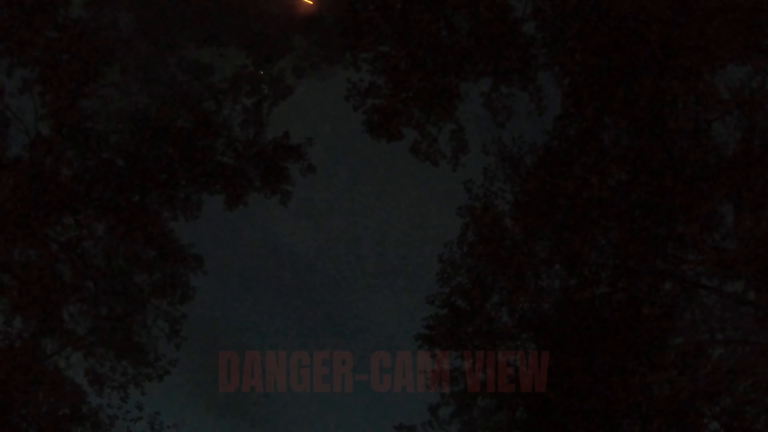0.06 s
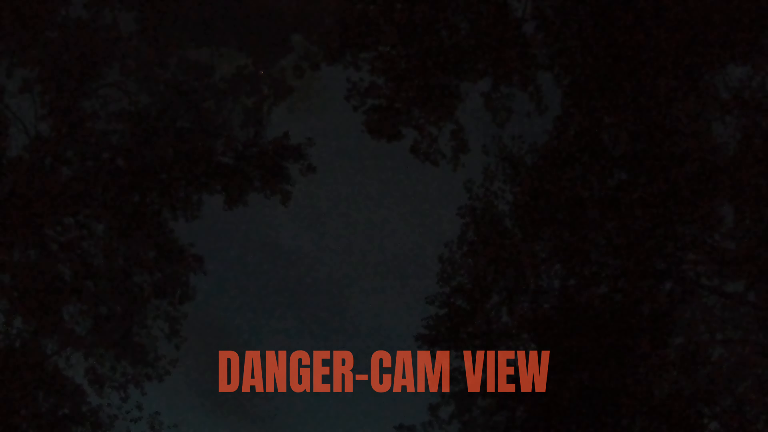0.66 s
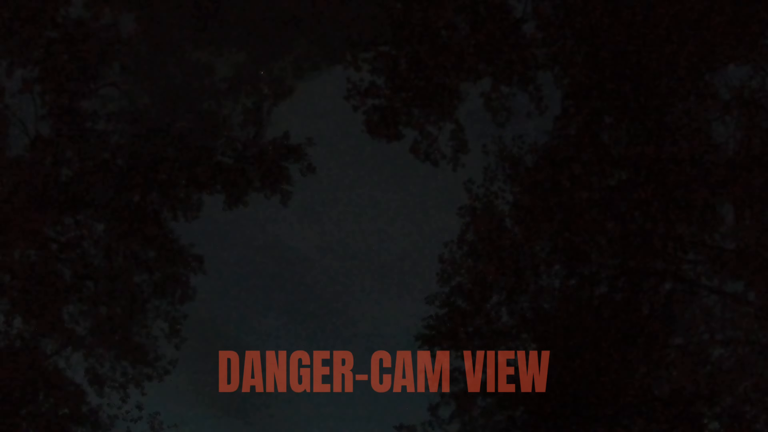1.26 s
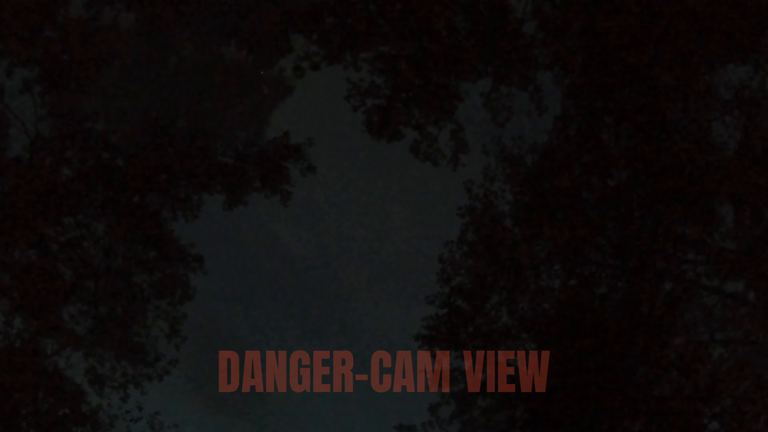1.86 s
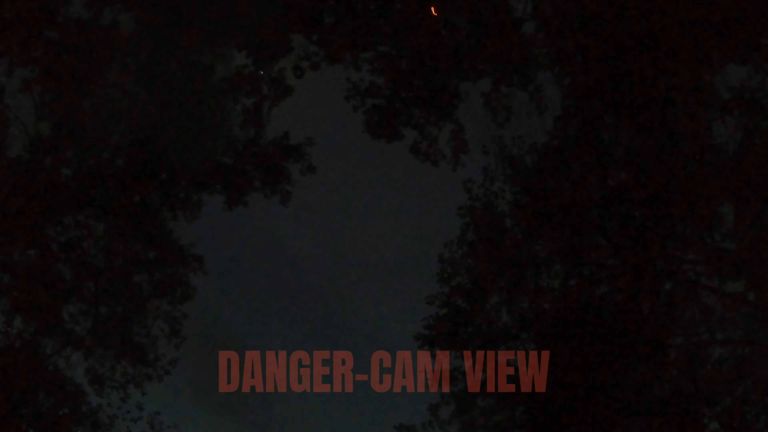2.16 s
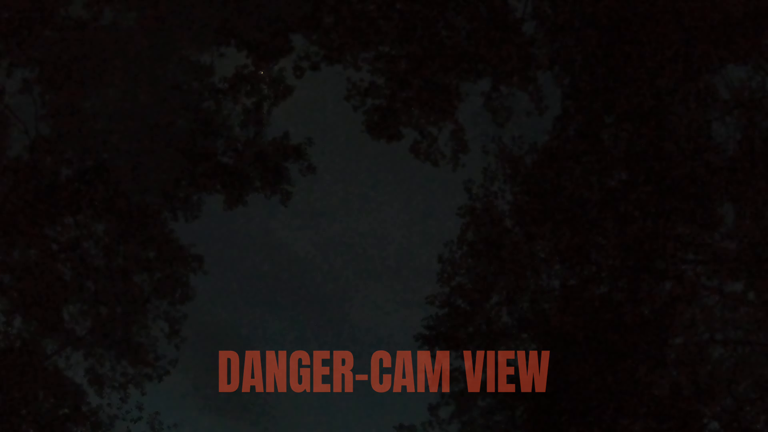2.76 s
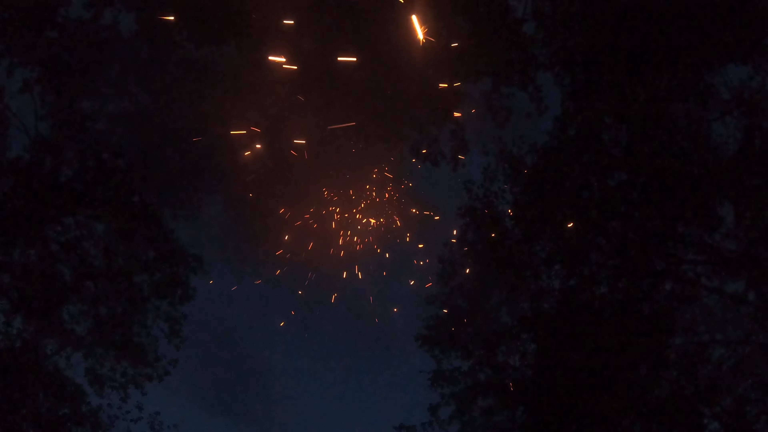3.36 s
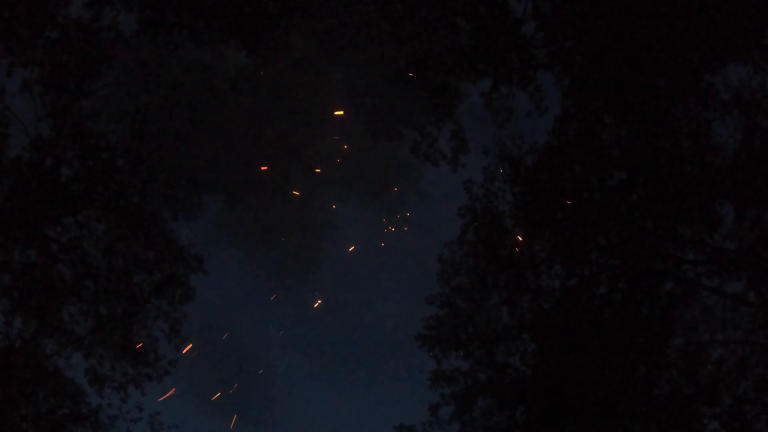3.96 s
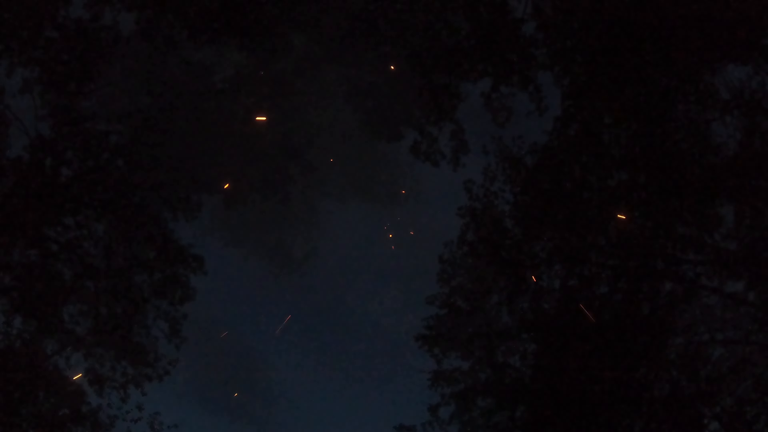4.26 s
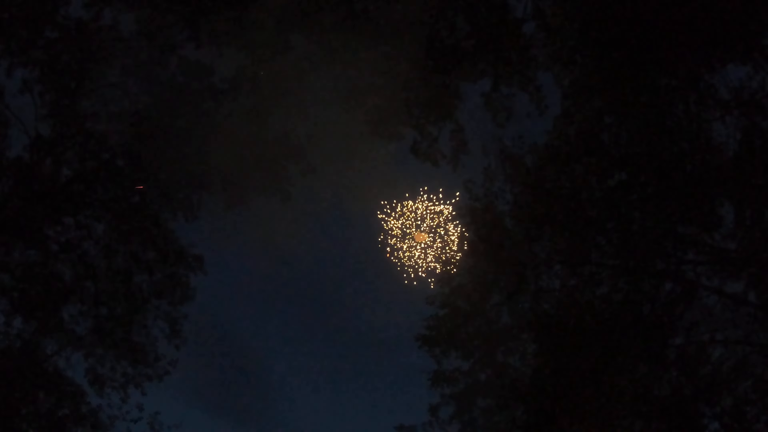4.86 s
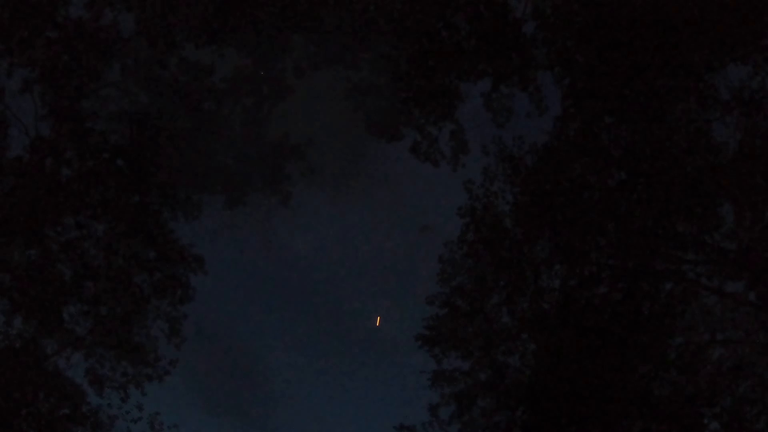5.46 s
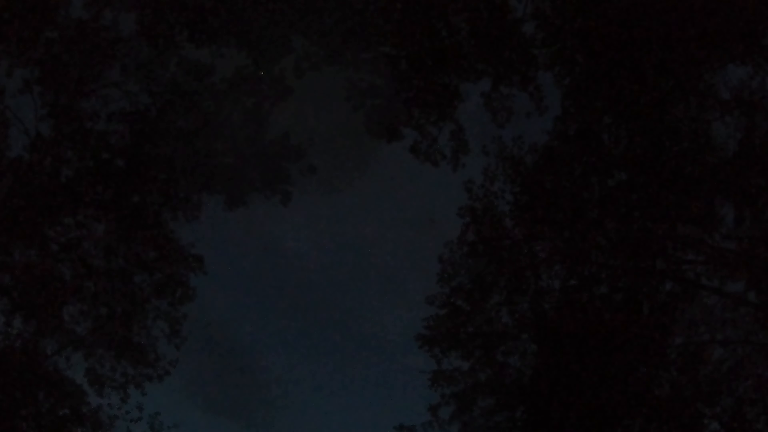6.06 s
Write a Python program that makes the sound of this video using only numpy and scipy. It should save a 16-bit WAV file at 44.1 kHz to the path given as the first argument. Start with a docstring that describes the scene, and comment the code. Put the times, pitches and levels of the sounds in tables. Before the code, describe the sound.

From the start, a firework fuse hisses and sputters in a mortar tube close by, slightly to the left. It is fairly quiet, with uneven spurts, a hollow ring from the tube and faint breathy whistles, over a low, wavering outdoor hum. At about 2.9 seconds the hiss ends in a sudden loud, thumping bang as the shell launches, and a short echo comes back from the woods. A dry snap follows just after 3.1 seconds, then a few faint ticks of falling scraps until about 4.4 seconds. At about 4.8 seconds the shell bursts overhead with a thump and a sharp, loud crack. Several quick echoes bounce back between 5 and 5.8 seconds, within a rolling rumble that grows duller and fades toward the end at about 6 seconds. Each blast pushes the background level down, so what follows sounds quieter.

```python
"""A firework fuse hisses, spurts and whistles in a mortar tube close by, over a low hum in the night air.
The lift charge bangs as hot gas tears out of the muzzle, scraps tick down, and the shell bursts
overhead with a thump and a sharp crack. Both blasts roll back from the woods, duller as they fade,
and each drives a gain control far down, from where it creeps back."""
import sys
import numpy as np
from scipy import signal
from scipy.fft import rfft, irfft
from scipy.io import wavfile
from scipy.ndimage import uniform_filter1d, minimum_filter1d

SR = 44100
rng = np.random.default_rng(int(sys.argv[2]) if len(sys.argv) > 2 else 0)


def persist_wave(psi):
    """Save psi, clipped to +-1, as 16-bit WAV."""
    counts = np.round(np.clip(psi, -1, 1) * 32767).astype(np.int16)
    wavfile.write(sys.argv[1], SR, np.atleast_2d(counts).T)


N = 269010
T = np.arange(N) / SR
HZ = np.fft.rfftfreq(1024, 1 / SR)  # moving spectra lie on this grid, one per frame
FRAME_T = np.arange(N // 256 + 5) * 256 / SR
LIFT_S, BURST_S = 2.889, 4.819

# stereo image of near and of far sounds: f/Hz, left-right likeness (-1..1)
NEAR = [(60, 1), (500, 0.97), (1400, 0.83), (3100, 0.57), (5500, 0.42), (8000, -0.29), (15000, -0.99)]
FAR = [(60, 0.37), (250, 1), (500, 0.39), (1000, 0), (2500, 0.29), (6000, 0), (15000, 0.017)]


def lift():
    """Hot gas roars up the tube for a few hundredths of a second and tears into a crack at the muzzle."""
    # tone of the deep roar and the brighter tear: f/Hz, level/dB
    roar_tone = [(15, 1), (40, 1), (160, 1), (320, 0), (700, 1), (1000, -2.5), (1400, -21.5), (3000, -26.5),
                 (6000, -38), (14000, -56.5)]
    tear_tone = [(100, 2), (400, 4.5), (1400, -2.5), (2200, -9), (3100, -7.5), (4000, -16), (6000, -13.5),
                 (9500, -23.5), (11000, -31.5), (15500, -51)]
    roar = noise(spectrum(roar_tone), NEAR)
    roar *= swell(LIFT_S, db=7.5, rise_db_per_s=1148.5, hold_s=0.0023, fall_db_per_s=1598.5)
    tear = noise(spectrum(tear_tone), NEAR)
    tear *= swell(LIFT_S, db=11.5, rise_db_per_s=3199, hold_s=0.0068, fall_db_per_s=4499.5)
    return (roar + tear) * pan(db=3)


def thumps():
    """Each pressure wave is a few swings that slow down as they die."""
    # direct and reflected waves: t/s, level/dB, start f/Hz, time to half pitch/s, decay/s, L-R/dB
    waves = [(2.8852, 13, 748, 0.018, 0.0025, 5), (2.886, 11.5, 45.1, .03, .014, 5),
             (2.898, 21, 190.6, 0.0066, .007, 3.5), (3.067, -13.5, 160, 0.029, 0.02, 3),
             (3.228, -4.5, 133, 0.033, 0.012, 4.5), (3.416, -17.5, 127.5, 0.088, 0.011, 4),
             (4.8078, 0, 600, 0.0015, 0.0029, -9), (4.819, 19.5, 1214, 0.0009, 0.0064, 5),
             (4.831, 5.5, 233, 0.15, 0.011, 3), (5.033, 8, 258, 0.017, 0.022, 3),
             (5.248, 7, 328, 0.014, 0.013, 2), (6.084, -1.5, 186.6, 0.039, 0.01, 3)]
    out, t = np.zeros((2, N)), np.arange(SR // 6) / SR
    for s, db, hz, glide, decay, side_db in waves:
        swing = np.sin(2 * np.pi * hz * glide * np.log1p(t / glide))
        envelope = np.exp(-t / decay) * (1 - np.exp(-t / .0002))
        add(out, s, gain_of(db) * swing * envelope * pan(side_db))
    return out


def cracks():
    """A shock is a sudden push and a longer suction; distance rounds its front."""
    # powder catching, the blasts and their echoes: t/s, peak/dB, push/ms, treble edge/Hz, L-R/dB
    shocks = [(2.8435, -36, .05, 8000, 7.5), (2.8533, -24, 0.35, 8000, -21.5),
              (2.8595, -29, 0.057, 8000, 5), (2.864, -34, .06, 8100, 3), (2.8838, 17.5, .45, 3030, 1.5),
              (4.8085, -11, 0.15, 4000, -1), (4.8189, 31, 0.27, 6900, -6.5), (4.8305, 5, 0.62, 1800, 0),
              (5, 4, 1, 3500, 5), (5.036, 12.5, 0.9, 2500, -1), (5.053, 8, .6, 1600, 3),
              (5.123, 6, .45, 1500, 2), (5.249, 8, 0.79, 1800, 6), (5.256, 3, .7, 1400, 5),
              (5.752, -3, 1, 1300, 6), (5.853, -24, 0.59, 1500, 4.5)]
    out, ms = np.zeros((2, N)), np.arange(400) * 1000 / SR
    for s, db, push_ms, edge_hz, side_db in shocks:
        shock = dulled((1 - ms / push_ms) * np.exp(-ms / push_ms), edge_hz)
        add(out, s, gain_of(db) * shock / shock.max() * pan(side_db))
    return out


def lead_in():
    """A brief dull swell of low noise leads into the crack."""
    # tone of the swell: f/Hz, level/dB
    swell_tone = [(15, 2), (65, 11), (160, -0.5), (320, 2), (500, -6.5), (800, -1), (1050, -9), (1350, -32),
                  (3000, -34), (6000, -45), (14000, -71)]
    level = swell(BURST_S, db=5.5, rise_db_per_s=903.5, hold_s=0.006, fall_db_per_s=2396.5)
    return level * noise(spectrum(swell_tone), NEAR) * pan(db=-4)


def woods():
    """Countless echoes from trunks and leaves; the later they come, the more treble the air has taken."""
    # echo tails: t/s, rumble level/dB, scatter level/dB, rise/s, hold/s,
    # rumble fade/(dB/s), scatter fade/(dB/s), opening treble tilt/(dB/octave)
    echoes = [(2.895, -27, -23, 0.0066, 0.24, 35, 33, 8), (4.251, -43, -45.5, 0.17, .2, 10, 8, -1),
              (4.82, -2.5, -5.5, 0.15, 0.27, 18, 20, 4.5)]
    # tone of the midrange scatter and the low rumble: f/Hz, level/dB
    scatter_tone = [(150, -7.5), (400, -2.5), (600, 3.5), (900, 1.5), (1400, -2.5), (2500, -10.5),
                    (4200, -17.5), (6500, -24.5), (9000, -29), (10800, -45.5), (15500, -60.5)]
    rumble_tone = [(15, -13.5), (50, -18.5), (90, 2), (140, 5.5), (280, 5), (400, -6), (700, -26.5),
                   (2000, -89)]
    late_tilt, dulling_s = -17, 0.82  # the tails darken towards this many dB per octave
    octaves = np.log2(1 + (HZ / 900) ** 2) / 2
    out = np.zeros((2, N))
    for s, rumble_db, scatter_db, rise_s, hold_s, rumble_fade, scatter_fade, first_tilt in echoes:
        fresh = np.exp(-np.maximum(FRAME_T[:, None] - s, 0) / dulling_s)
        tilt = late_tilt + (first_tilt - late_tilt) * fresh
        rise = 1 - np.exp(-np.maximum(T - s, 0) / rise_s)
        fading_s = np.maximum(T - s - hold_s, 0)
        scatter = noise(spectrum(scatter_tone) + tilt * octaves, FAR)
        scatter *= gain_of(scatter_db - scatter_fade * fading_s + 0.76 * drift(rate_hz=110))
        rumble = noise(spectrum(rumble_tone), FAR)
        rumble *= gain_of(rumble_db - rumble_fade * fading_s + 1.4 * drift(rate_hz=9))
        out += (scatter + rumble) * np.sqrt(rise)
    return out * pan(db=3)


def fuse():
    """A sputtering jet of burning powder hisses and rings the tube until the lift charge fires."""
    # how hard the fuse burns, ahead of the trims below: t/s, ring/dB, hiss/dB, fizz/dB
    burn = [(0, -41, -55, -56), (.3, -44.5, -55, -55), (.6, -41.5, -52, -51.5), (.88, -39.5, -55.5, -53.5),
            (1.04, -36, -47, -50.5), (1.24, -40, -54.5, -77), (1.45, -43, -60, -74),
            (1.53, -40, -52.5, -55.5), (1.65, -42, -55.5, -57), (1.72, -37, -49.5, -53),
            (1.9, -38, -48.5, -52), (2.08, -34, -46.5, -49), (2.16, -38.5, -58, -63),
            (2.27, -32.5, -43.5, -48), (2.4, -35.5, -57, -70), (2.55, -33, -57.5, -63),
            (2.77, -40, -63, -69), (2.84, -30.5, -55, -58)]
    # resonances of the tube's air column: t/s, first f/Hz, second f/Hz, third f/Hz
    air_column = [(0, 480, 1033, 2050), (.6, 480, 985, 2100), (1, 475, 1013, 2045), (1.4, 458, 1050, 1940),
                  (2, 463, 1020, 2000), (2.85, 449, 1049, 1820)]
    # tone of the jet's low rush, hiss and high fizz: f/Hz, level/dB
    rush_tone = [(60, -23), (180, 0), (380, 3), (600, -7), (1500, -50)]
    hiss_tone = [(200, -14.5), (700, -10), (1300, 7.5), (1700, 0.5), (2500, -6), (3150, 2), (3600, -4),
                 (4100, -19.5), (5500, -15), (9000, -52.5)]
    fizz_tone = [(2000, -44), (4200, -2), (5200, 2), (7200, -1), (8200, -6.5), (9100, -3), (10600, -13.5),
                 (12500, -18), (15500, -26)]
    ring_db, hiss_db, fizz_db = follow(burn, T)
    first_hz, second_hz, third_hz = follow(air_column, FRAME_T)
    dips_db = notches()
    # the colour of the hiss wanders in small patches
    patches = uniform_filter1d(rng.standard_normal(dips_db.shape), size=30, axis=0)
    colour_db = dips_db + 1.9 * unit_rms(uniform_filter1d(patches, size=6, axis=1))
    colour_db += 0.5 * np.cos(2 * np.pi * HZ / 501)  # ripple of the tube's higher modes, 501 Hz apart
    tube = gain_of(ring_db + 0.78) * noise(resonance(first_hz, width_hz=48, steep=1.3), NEAR)
    tube += gain_of(-44) * noise(resonance(second_hz, width_hz=240, steep=2.6), NEAR, dips_db)
    tube += gain_of(-48.5) * noise(spectrum(rush_tone), NEAR)
    jet = gain_of(-49) * noise(resonance(third_hz, width_hz=160, steep=0.96), NEAR, dips_db)
    jet += gain_of(hiss_db + 4.5) * noise(spectrum(hiss_tone), NEAR, colour_db)
    jet += gain_of(fizz_db - 3) * noise(spectrum(fizz_tone), NEAR, colour_db) + whistles()
    tube_boost_db, jet_boost_db = spurts()
    flutter_db = 1.9 * drift(rate_hz=24)
    grit_db = 2.2 * drift(rate_hz=660)
    tube *= gain_of(tube_boost_db + flutter_db + 0.25)
    jet *= gain_of(jet_boost_db + .65 * flutter_db + grit_db - 2.73)
    burning = np.clip((LIFT_S - T) / 0.0088, 0, 1)
    return (tube + jet) * burning * pan(db=5)


def spurts(rise_s=.013, fall_s=.016):
    """Grains of powder flare up: brief level bumps in dB for the tube and the jet."""
    # strongest flares: t/s, tube boost/dB, jet boost/dB
    flares = [(0.141, 5.5, 4.5), (.521, 3, 5), (.18, 6, 1.5), (0.37, 9, 4.5), (0.467, 2.5, 2.5),
              (0.555, 8, 5.5), (.618, 11, 10.5), (0.678, 5, 6), (0.845, 6.5, 5), (0.943, 9, 6),
              (1.347, 7, 7), (1.575, 4.5, 3.5), (1.706, 5, 9), (1.758, 6.5, 4.5), (1.883, 2.5, 8),
              (1.921, 7, 1.5), (2.135, 8, 4.5), (2.19, -6, 6), (2.371, 9, 3), (2.509, 5, 5),
              (2.642, 6.5, -2)]
    boost_db = np.zeros((2, N))
    for s, tube_db, jet_db in flares:
        bump = np.exp(-((T - s) / np.where(T < s, rise_s, fall_s)) ** 2)
        boost_db += np.outer([tube_db, jet_db], bump)
    return boost_db


def notches():
    """Reflections cut dips, in dB, into the jet's sound; they climb as the flame creeps along."""
    # one path per notch, each point: t/s, f/Hz, depth/dB
    paths = [
        [(0, 1480, 2.5), (.6, 1980, 15), (.8, 2500, 19.5), (1.08, 3150, 11.5), (1.35, 3900, 4)],
        [(1.05, 760, 2), (1.4, 900, 11.5), (1.85, 980, 7.5), (2.12, 1400, 18), (2.4, 2040, 20.5),
         (2.85, 2470, 11.5)],
        [(0, 4070, 9), (.32, 4400, 9.5), (.78, 5680, 13), (1.35, 6250, 1), (1.75, 7150, 14.5),
         (2.2, 8400, -0.5)],
        [(1.9, 4210, 0.5), (2.35, 4550, 4.5), (2.85, 4870, 7)],
    ]
    dips_db, t = 0, FRAME_T[:, None]
    for path in paths:
        hz, depth_db = follow(path, t)
        width_hz = 370 + .025 * hz
        is_open = np.clip(1 - (t - path[-1][0]) / .1, 0, 1)  # closes as its path ends
        dips_db -= depth_db * is_open * np.exp(-((HZ - hz) / width_hz) ** 2)
    return dips_db


def whistles():
    """Each breathy whistle of the jet comes up quickly, glides and fades out."""
    # rising whistles: start t/s, end t/s, start f/Hz, end f/Hz, level/dB
    glides = [(0, .3, 4770, 5150, -61), (.3, 0.687, 6530, 6840, -58.5), (0.699, 0.976, 6300, 6450, -52.5),
              (0.933, 1.204, 6750, 7000, -58.5), (1.685, 1.97, 5860, 6100, -50.5),
              (1.937, 2.207, 6400, 6550, -57), (2.245, 3, 5560, 5650, -59)]
    hz, level = np.full(len(FRAME_T), float(glides[0][2])), np.zeros(N)
    for start, end, start_hz, end_hz, db in glides:
        hz = np.where(FRAME_T >= start, np.interp(FRAME_T, [start, end], [start_hz, end_hz]), hz)
        age = np.clip((T - start) / (end - start), 0, 1)
        level += gain_of(db) * np.sqrt(abs(np.sin(np.pi * age ** 0.53)))
    return level * noise(resonance(hz, width_hz=480, steep=1.9), FAR)


def scraps(crumbs_per_s=700, crumble_s=.035):
    """Small scraps land with a dry snap and barely any ring, then crumble in a short rustle."""
    # embers and scraps landing: t/s, level/dB, ring f/Hz
    landings = [(3.138, -11, 2970), (3.402, -40.5, 8950), (3.6, -41, 6400), (3.957, -39, 2950),
                (4.182, -40, 2110), (4.2002, -25, 1880), (4.38, -39.5, 1713), (4.384, -39, 2560)]
    out, t = np.zeros((2, N)), np.arange(SR // 8) / SR
    shape = (2, len(t))
    for s, db, hz in landings:
        ring = np.sin(2 * np.pi * hz * t) * np.exp(-t * hz / 2)  # decay time of two cycles
        snap = rng.standard_normal(shape) * .5 * np.exp(-t / 0.00037)
        crumbs = rng.standard_normal(shape) * (rng.random(shape) < crumbs_per_s / SR)
        crumbs *= np.exp(-t / crumble_s)
        rustle = signal.oaconvolve(crumbs, ring[None])[:, :len(t)] + crumbs
        tick = ring + dulled(snap + gain_of(-15) * rustle, edge_hz=6700)
        add(out, s, gain_of(db) * tick * pan(db=8))
    return out


def sizzle(lead_s=0.079):
    """A faint narrow hiss sputters up in the moments before the shell bursts."""
    band = resonance(np.full(len(FRAME_T), 4000.), width_hz=1200, steep=1.2)
    level = swell(BURST_S - lead_s, db=-47, rise_db_per_s=260, hold_s=.085, fall_db_per_s=400)
    return noise(band, FAR) * level * gain_of(3.4 * drift(rate_hz=90)) * pan(db=3)


def night():
    """A wavering low hum, like a distant engine, in dull outdoor noise."""
    # tone of the outdoor bed: f/Hz, level/dB
    air_tone = [(15, -9), (40, -7), (100, 3.5), (150, 1), (250, -2.5), (450, -11), (1000, -11.5),
                (1500, -21.5), (2500, -37.5), (4000, -31), (5500, -40), (9000, -42), (15000, -62.5)]
    hum_hz = 62.5 + 1.4 * drift(rate_hz=11)
    hum = gain_of(-37 + 1.2 * drift(rate_hz=8.4)) * np.sin(2 * np.pi * np.cumsum(hum_hz) / SR)
    air = gain_of(-42.5) * noise(spectrum(air_tone), NEAR)
    return (hum + air) * pan(db=4.2)


def noise(tone_db, image, colour_db=0):
    """Stereo noise of rms 1 with a fixed or moving tone; steady unless colour_db dips or lifts it."""
    a, b, c, d = rng.standard_normal((4, len(FRAME_T), len(HZ)))
    likeness = np.clip(spectrum(image), -1, 1)
    left = a + 1j * b
    right = likeness * left + np.sqrt(1 - likeness ** 2) * (c + 1j * d)
    size = gain_of(tone_db + colour_db) / np.linalg.norm(gain_of(tone_db), axis=-1, keepdims=True)
    frames = (np.array([left, right]) * size).transpose(0, 2, 1)
    return unit_rms(signal.istft(frames, nperseg=1024, noverlap=768)[1][:, :N])


def drift(rate_hz):
    """Random wobble of rms 1, mostly slower than rate_hz."""
    f = np.fft.rfftfreq(N, 1 / SR)
    return unit_rms(irfft(rfft(rng.standard_normal(N)) / (1 + (f / rate_hz) ** 4), N))


def swell(s, db, rise_db_per_s, hold_s, fall_db_per_s):
    """Gain that climbs to a level at time s, holds it and falls away."""
    early_s, late_s = np.maximum(s - T, 0), np.maximum(T - s - hold_s, 0)
    return gain_of(db - rise_db_per_s * early_s - fall_db_per_s * late_s)


def resonance(hz, width_hz, steep):
    """A moving peak in dB."""
    return -10 * steep * np.log10(1 + (2 * (HZ - hz[:, None]) / width_hz) ** 2)


def dulled(x, edge_hz):
    """Takes off the treble above an edge of at most 8 kHz."""
    return signal.sosfilt(signal.butter(3, min(edge_hz, 8000), fs=SR, output="sos"), x)


def spectrum(points):
    """Joins points along a log frequency axis."""
    f, value = np.transpose(points)
    return np.interp(np.log(HZ + 1), np.log(f + 1), value)


def follow(rows, t):
    """The columns of a curve at the times t."""
    s, *columns = np.transpose(rows)
    return [np.interp(t, s, c) for c in columns]


def gain_of(db):
    return 10 ** (np.asarray(db) / 20)


def unit_rms(x):
    return x / np.sqrt(np.mean(x ** 2) + 1e-20)


def pan(db):
    """Stereo gains with the left louder by db."""
    return gain_of(np.array([[db], [-db]]) / 2)


def add(mix, s, sound):
    part = mix[:, round(s * SR):][:, :sound.shape[-1]]
    part += sound[..., :part.shape[1]]


def scene():
    """Fuse, lift charge, falling scraps and burst, with their echoes in the night."""
    blasts = lift() + lead_in() + thumps() + cracks()
    return blasts + night() + fuse() + scraps() + sizzle() + woods()


def record(dry):
    """Gain control ducks at once on a blast and creeps back; then soft clipping and a band limit."""
    threshold_db, max_duck_db, recovery_db_per_s, edge_hz = -8, 21, 4, 15700
    power_db = 10 * np.log10(abs(uniform_filter1d((dry ** 2).mean(0), size=66)) + 1e-12)
    over_db = np.clip(power_db - threshold_db, 0, max_duck_db)
    recovery_db = recovery_db_per_s * T
    duck_db = np.maximum.accumulate(over_db + recovery_db) - recovery_db
    lookahead_db = -minimum_filter1d(-duck_db, size=64)
    ducked = dry / gain_of(uniform_filter1d(lookahead_db, size=48))
    # the part beyond a soft ceiling is smoothed, then taken away
    overload = ducked - .95 * ducked / (1 + ducked ** 8) ** (1 / 8)
    clipped = ducked - signal.oaconvolve(overload, np.array([[1, 4, 6, 4, 1]]) / 16, "same")
    lowpass = signal.firwin(511, edge_hz, window=("kaiser", 9), fs=SR)
    return signal.oaconvolve(clipped, lowpass[None], "same")


dry = scene()
out = record(dry)
persist_wave(out)
```